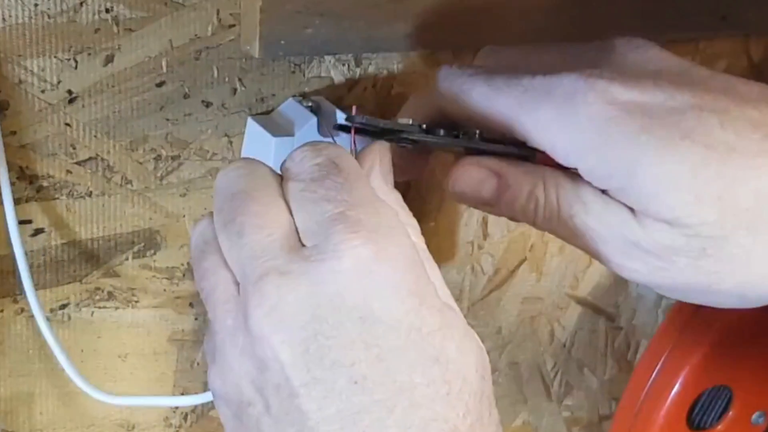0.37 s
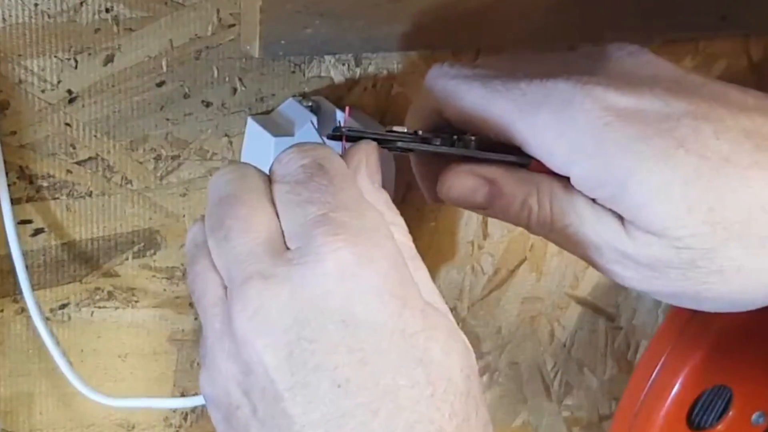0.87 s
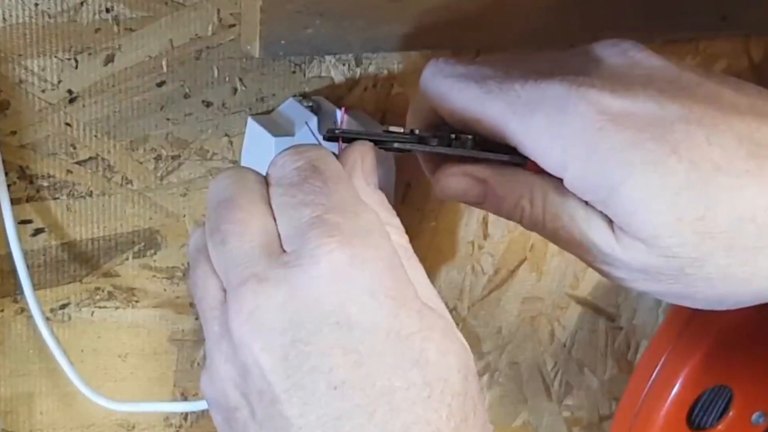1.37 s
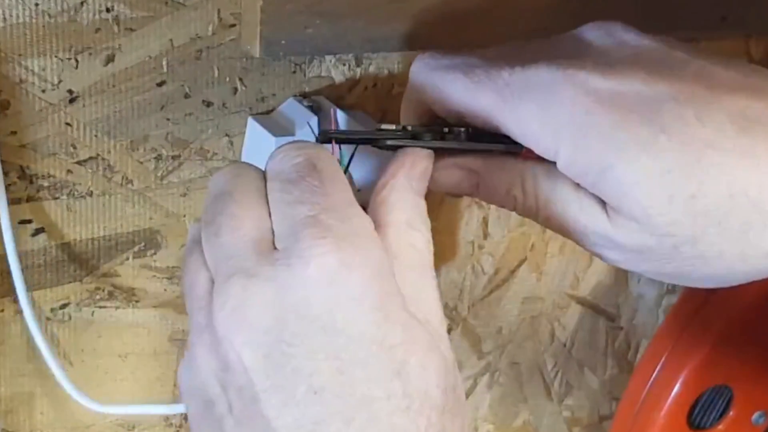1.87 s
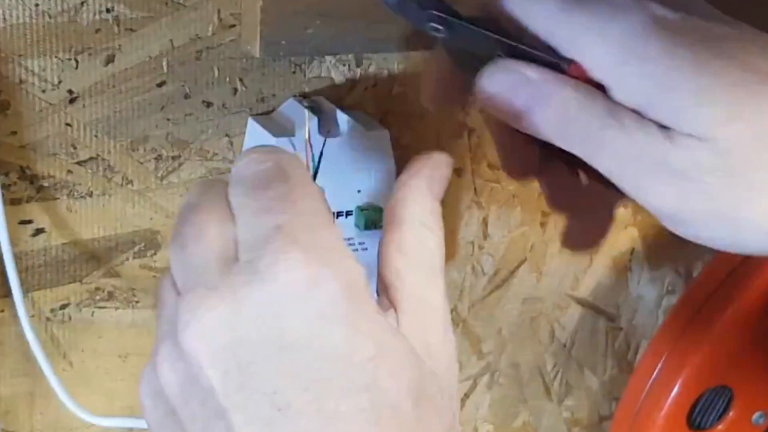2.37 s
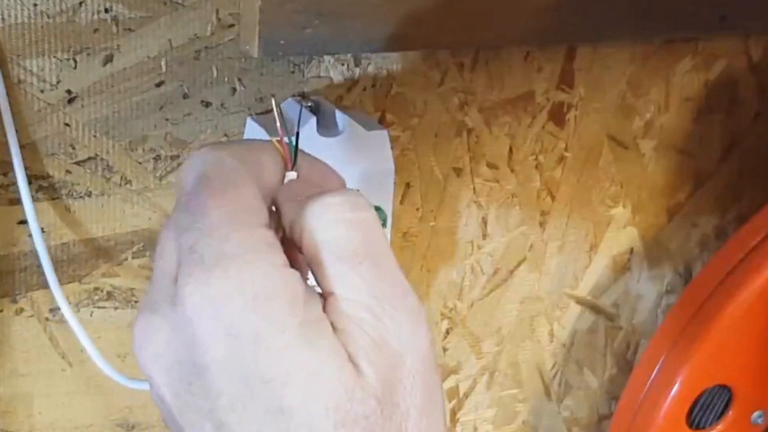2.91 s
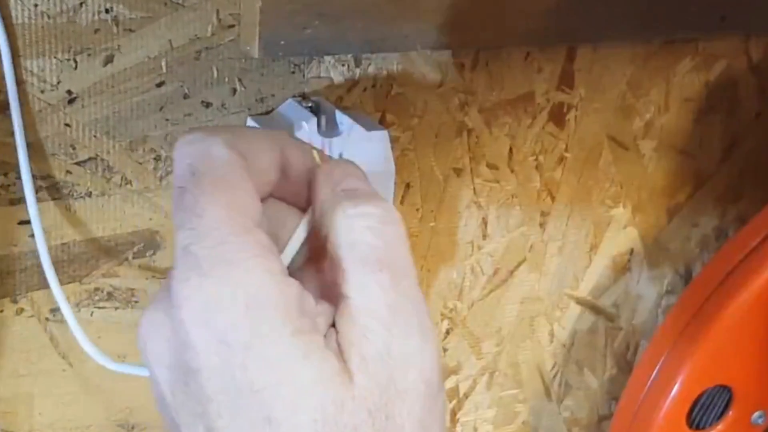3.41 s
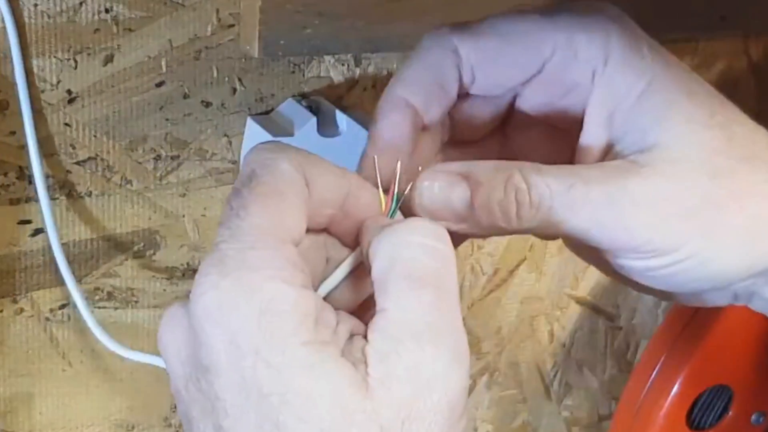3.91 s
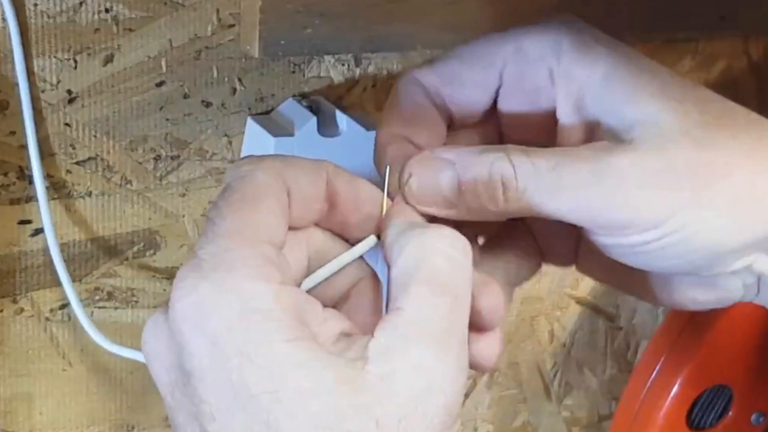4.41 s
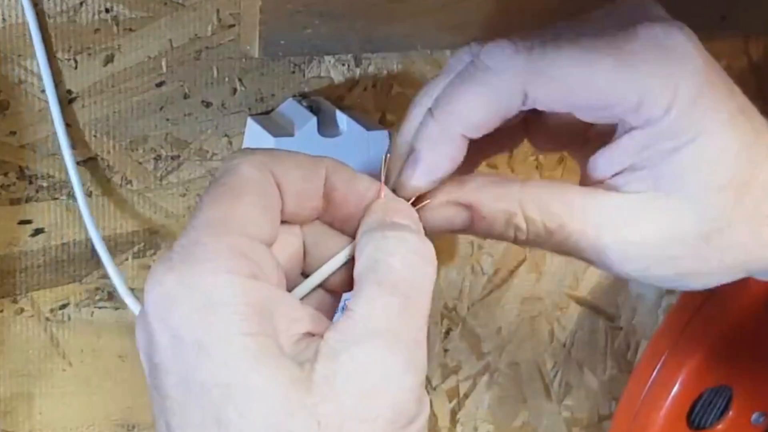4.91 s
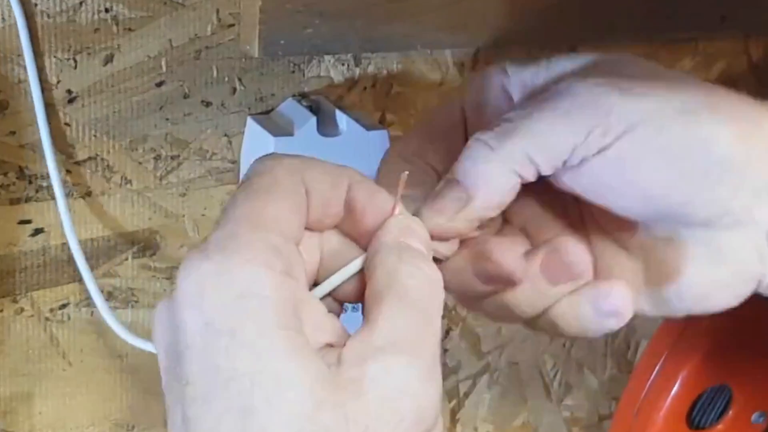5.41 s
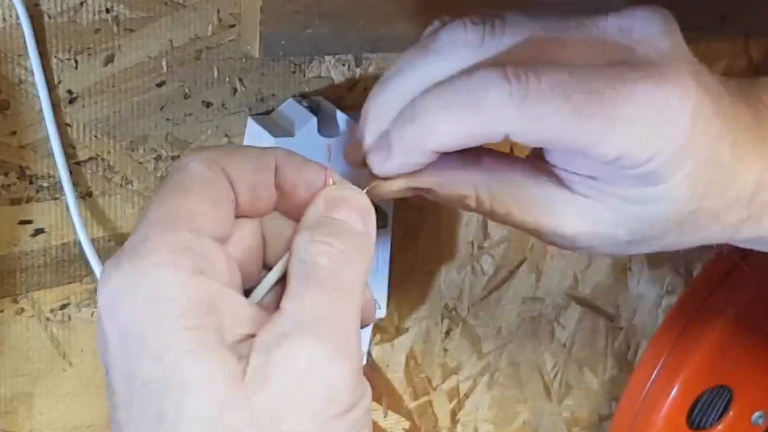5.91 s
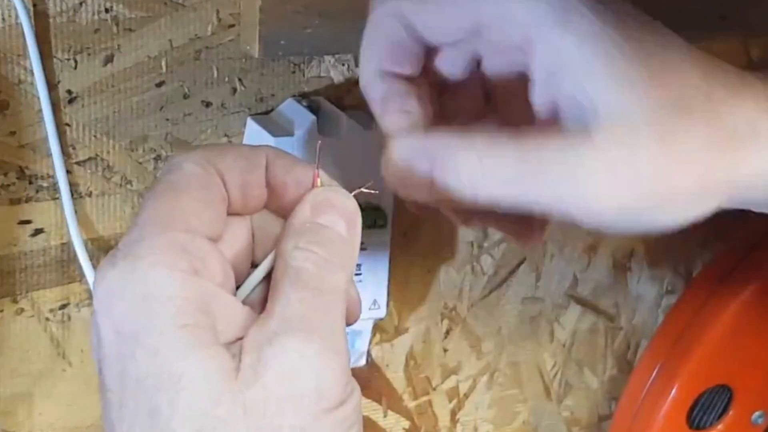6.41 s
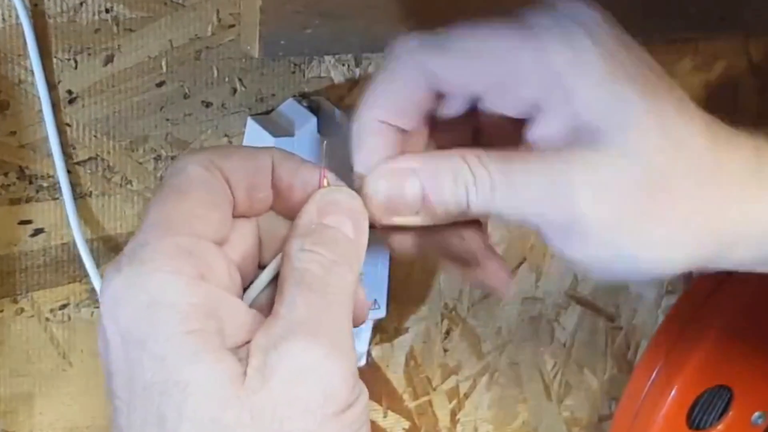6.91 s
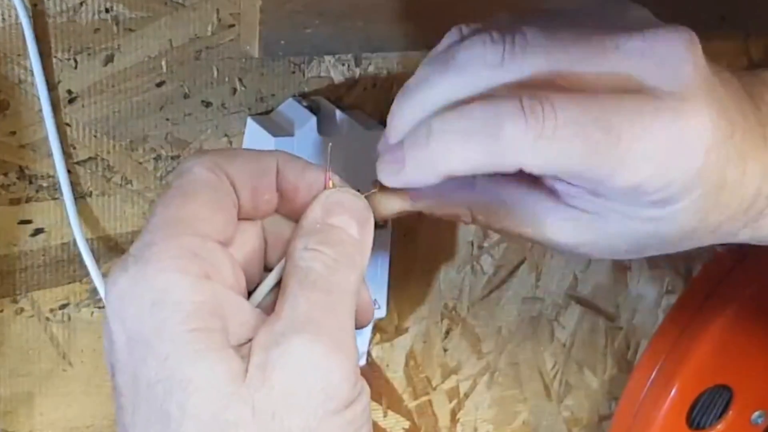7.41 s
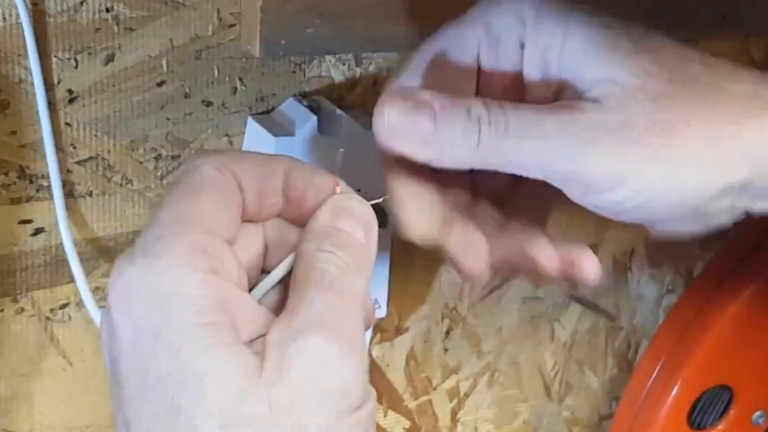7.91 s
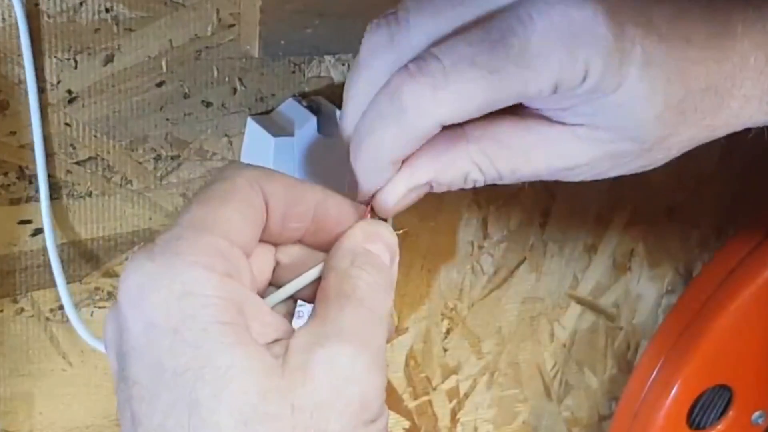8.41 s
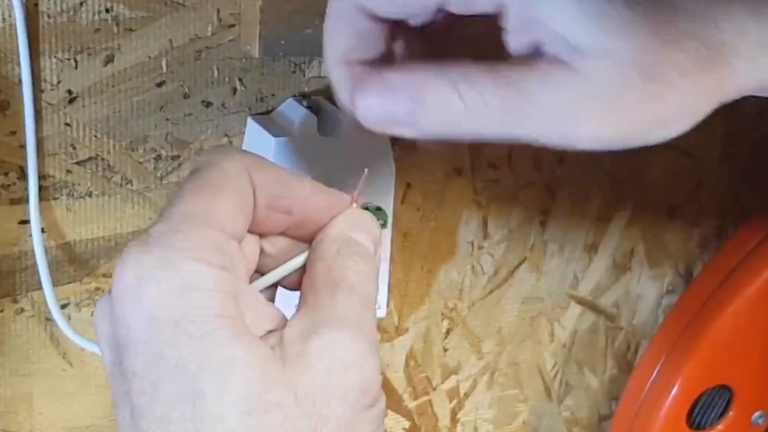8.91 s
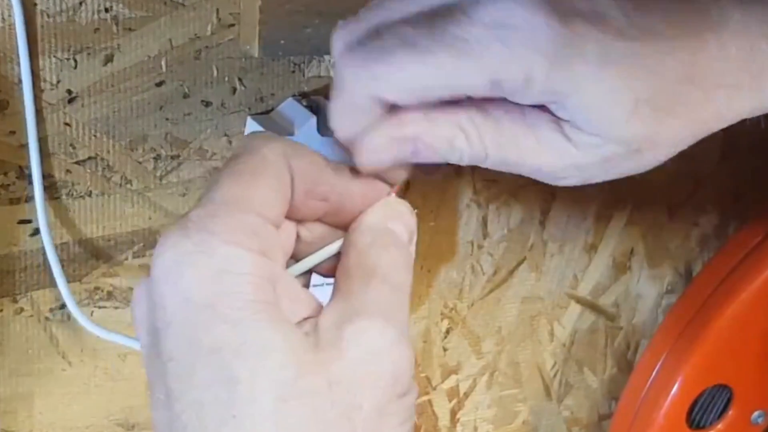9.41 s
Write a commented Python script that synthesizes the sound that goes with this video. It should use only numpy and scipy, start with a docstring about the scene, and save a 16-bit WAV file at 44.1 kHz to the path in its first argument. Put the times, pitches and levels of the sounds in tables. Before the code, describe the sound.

A small room with a soft, wavering low hum, faint mains buzz and a light fan-like hiss throughout, heard close in stereo. The first second is almost only hum; a dull bump and tiny ticks come around 1.3-1.5 s. At 2.2 s there is a bump with a crack, then light cable knocks from 2.35 to 2.85 s and faint high metallic chinks near 2.6 s. At 3.2 s a hand tool drops onto the wooden board: by far the loudest event, a hard hollow clack and rapid bounces, weakening until about 3.8 s, with low brushing of hands. Then it is quiet, with sparse strand ticks and faint bumps until 5 s. Soft cable taps and brushing come at 5.6 s, more taps at 6.2-7.3 s, crisp finger rubs near 7.1 and 7.9 s, several knocks at 8.0-8.3 s, a firmer tap at 8.9 s, a sharp tick at 9.15 s, and small rustles to the end at about 9.5 s.

```python
"""Stripping thin wires at a bench

Hands strip and twist thin wires over a chipboard bench in a small room with a humming machine.
The loose cable knocks on the board, hands and stripper bump it, the stripper drops and bounces: each
blow sets off a bank of decaying modes. Strands tick and fingers rub as short puffs of grainy noise,
sleeves brush as lumpy low noise. A wavering tone, mains buzz harmonics and a fan-like hiss lie under it.
"""
import sys
import numpy as np
from scipy import signal
from scipy.fft import rfft, irfft, next_fast_len
from scipy.io import wavfile
from scipy.ndimage import uniform_filter1d, map_coordinates

SR = 44100
rng = np.random.default_rng(int(sys.argv[2]) if len(sys.argv) > 2 else 0)


def boost(x):
    """Linear amplitude factor 10**(x/20) for a level x in decibels (scalar or array-like)."""
    u = np.asarray(x, float) / 20
    return 10 ** u


def dump_mix(stems):
    """Bounce the given channels to the path in sys.argv[1] as a 16-bit WAV at rate SR."""
    frames = np.atleast_2d(stems).T  # one column per channel
    limited = np.clip(frames, -1, 1)  # hard clip at full scale
    pcm = np.round(limited * 32767).astype(np.int16)
    wavfile.write(sys.argv[1], SR, pcm)


N = 421155  # length in samples


def unit(x):
    """Scale to rms 1."""
    return x / np.sqrt(np.mean(x ** 2) + 1e-20)


def along(points, hz):
    """Read a curve of (frequency [Hz], value) points on a log frequency axis."""
    f, v = np.transpose(points)
    return np.interp(np.log(hz + 1), np.log(f + 1), v)


def wobble(rate):
    """A smooth random curve, rate knots a second."""
    knots = rng.standard_normal(int(N * rate / SR) + 4)
    return map_coordinates(knots, [np.arange(N) * rate / SR])


def coloured(spectrum, alike, size):
    """Stereo noise of rms 1 with a spectrum and a left-right likeness."""
    m = next_fast_len(size)
    hz = np.fft.rfftfreq(m, 1 / SR)
    turn = np.arccos(np.clip(along(alike, hz), -1, 1)) / 2
    z = rfft(rng.standard_normal((2, m))) * boost(along(spectrum, hz))
    mid, side = irfft(z * [np.cos(turn), np.sin(turn)], m)[:, :size]
    return unit(np.array([mid + side, mid - side]))


def add(track, s, sound):
    """Mix a stereo sound in at time s."""
    i = round(s * SR)
    track[:, i:i + sound.shape[1]] += sound


def sides(pan_db):
    """Left and right gains for a level of left over right."""
    return boost(np.multiply.outer([.5, -.5], pan_db))


def ringing(modes, travel, lag, attack, rough, apart_hz=1500):
    """Each mode at both ears; bending waves carry the treble faster, so delay goes as 1 / sqrt(Hz).
    A mode stands for a crowd of close neighbours, so its phase drifts, the more so the higher it lies."""
    hz, db, t60 = np.transpose(modes)[:3, :, None]
    # a positive lag delays the left side, a negative one the right
    delay = travel * np.sqrt(1000 / hz) + np.abs(lag) * np.reshape([lag > 0, lag < 0], (2, 1, 1))
    t = np.maximum(np.arange(SR // 4) / SR - delay, 0)

    shared, own = np.cumsum(rng.standard_normal((2, len(hz), SR // 100)), axis=2)
    # bass drifts alike at both ears
    walk = shared + np.multiply.outer([1, -1], own * np.minimum(hz / apart_hz, 1))
    # one random step every 32 samples, smoothed
    walk = np.repeat(walk - walk[..., :1], 32, axis=2)[..., :SR // 4]
    walk = uniform_filter1d(uniform_filter1d(walk, 32, axis=2), 32, axis=2)
    drift = walk * np.sqrt(2 * np.pi * rough * hz * np.sqrt(hz / 1000) * 32 / SR)

    envelope = boost(db - 60 * t / t60) * (1 - np.exp(-t / attack)) ** 2
    return envelope * np.sin(2 * np.pi * hz * t + drift)


def strike(rows, modes, pivot_hz, scatter_db, tilt_db, attack, pan_db=0, reach_hz=SR, **body):
    """Every blow excites the same modes, tilted by its brightness [dB per octave] and scattered a little;
    a soft contact reaches only low modes."""
    out, hz = np.zeros((2, N + SR)), np.transpose(modes)[0]
    radiation = sides(np.transpose(modes)[3] if len(modes[0]) > 3 else 0 * hz)
    scatter = scatter_db * rng.standard_normal((len(rows), len(hz)))
    blows = np.broadcast(*np.transpose(rows)[:2], tilt_db, reach_hz, attack)
    for (s, db, tilt, reach, rise), chance in zip(blows, scatter):
        level_db = db + tilt * np.log2(hz / pivot_hz) + chance
        gains = radiation * boost(level_db) / (1 + (hz / reach) ** 4)
        modes_ringing = ringing(modes, attack=rise, **body)
        add(out, s, np.einsum("cm,cmt->ct", gains, modes_ringing) * sides([pan_db]))
    return out[:, :N]


def hiss():
    """The hiss of the room: coloured stereo noise whose level wavers slightly."""
    # spectrum: (frequency [Hz], relative density [dB per Hz])
    spectrum = [(20, -7), (40, -14.5), (64, 1), (90, -7.5), (150, -16), (250, -16), (500, -21), (1000, -23),
                (1400, -24.5), (2200, -19.5), (3500, -26), (5000, -36), (8500, -42), (14000, -34),
                (16000, -34.5)]
    # (frequency [Hz], left-right likeness [-1 to 1])
    alike = [(60, 0.64), (180, 0.34), (550, -0.17), (1650, -0.045), (4970, 0.068), (15000, -0.5)]
    return boost(-59.5 + 0.14 * wobble(1.5)) * coloured(spectrum, alike, size=N)


def buzz():
    """Mains buzz: steady-pitched harmonics, each slightly unsteady in level and shifted between the ears."""
    base_hz = 119.6  # twice the mains
    # harmonics: (multiple of base_hz, mean level [dB rms])
    harmonics = [(1, -70.5), (3, -72), (4, -71.5), (5, -86), (7, -76.5), (8, -83.5), (9, -87.5), (11, -85),
                 (18, -85), (22, -84), (25, -105), (29, -96), (31, -85.5)]
    t = np.arange(N) / SR
    turns = rng.uniform(0, 2 * np.pi, (len(harmonics), 2, 1))
    out = np.zeros((2, N))
    for (k, db), (left, right) in zip(harmonics, turns):
        phase = left + 0.19 * right * [[0], [1]]
        level = np.sqrt(2) * boost(db + 0.45 * wobble(3.9))
        out += level * np.sin(2 * np.pi * k * base_hz * t + phase)
    return out


def hum():
    """The machine's hum: one low tone, wavering in phase and level."""
    hum_hz = 63.9
    # hum level before its random wavering: (time [s], level [dB rms])
    levels = [(0.0, -52), (0.2, -50), (0.79, -48.5), (1.09, -50), (2.02, -47.5), (2.74, -50), (3.4, -48),
              (3.9, -47), (4.12, -49.5), (4.45, -48), (4.8, -52.5), (5.08, -48.5), (6.41, -49.5),
              (6.89, -49), (7.9, -50), (8.16, -48.5), (9.55, -49.5)]
    s, db = np.transpose(levels)
    t = np.arange(N) / SR
    phase = 2 * np.pi * hum_hz * t + .4 * wobble(2.5) + 0.14 * wobble(13)
    level = np.sqrt(2) * boost(np.interp(t, s, db) + 0.67 * wobble(4.7))
    return level * np.sin(phase) * sides([.6])


def brushing():
    """Palms and sleeves brush the board: lumpy low friction noise while the hands shift."""
    # brushing level before its random lumps: (time [s], level [dB])
    levels = [(0, -86), (3.3, -71), (3.4, -58.5), (3.6, -57.5), (4.0, -72), (4.8, -72), (5.1, -67),
              (5.4, -74), (5.62, -62), (6.0, -66.5), (6.15, -79.5), (7.5, -81), (7.9, -60.5),
              (8.001, -71.5), (9.55, -75.5)]
    # colour of the friction: (frequency [Hz], relative density [dB per Hz])
    skin = [(80, -23), (200, -1), (400, 0), (700, -3.5), (1000, -12), (3000, -27), (6000, -59)]
    s, db = np.transpose(levels)
    level = boost(np.interp(np.arange(N) / SR, s, db) + 2.56 * wobble(24))
    return level * coloured(skin, [(300, 0.59)], size=N)


def strands():
    """Short puffs of grainy friction noise: ticks start almost at once, rubs swell."""
    # sudden ticks of strands and cracks of the tool:
    # (time [s], treble [dB], t60 [s], body over treble [dB], left over right [dB])
    ticks = [(1.319, -81, .055, 26.5, 5), (1.543, -70, 0.025, -20, -1.1), (2.194, -58, 0.094, 9.5, 5.5),
             (2.335, -62, .089, -0.5, 10), (2.581, -59, .07, 0.5, 4), (2.628, -61.5, .23, -5, 3.2),
             (3.177, -65.5, .06, 14, 2.3), (3.225, -35.5, 0.067, 5.5, 1.5), (3.266, -40, 0.1, 13.5, 2),
             (3.30, -69.5, 0.3, 21, 0.2), (3.342, -68.5, 0.13, 24, -6), (3.357, -72, .13, 27, 1.5),
             (3.823, -70.5, .064, 15.5, 1), (4.246, -64.5, 0.033, 18.5, 11), (4.422, -72, 0.073, 18.5, 10),
             (4.544, -73.5, 0.057, 18, 8), (4.82, -82, 0.095, 17, 13), (8.651, -54, 0.031, 11, 6.5),
             (9.08, -74, 0.063, 16.5, 4), (9.147, -52.5, 0.016, -26, -6), (9.513, -62.5, 0.044, 8, 6.5)]
    # fingers rub along the strands: (time [s], treble [dB], t60 [s], body over treble [dB])
    rubs = [(5.0, -68.5, 0.2, 6.5), (5.52, -67, .13, -4), (6.35, -63.5, 0.084, 9.5),
            (7.056, -53.5, 0.056, 0), (7.08, -62, .3, -4), (7.69, -71, 0.29, 6), (7.875, -47, 0.052, -4),
            (7.90, -60.5, .15, 5), (8.73, -73.5, 0.21, 15), (8.83, -64, 0.22, -2), (9.383, -65, 0.14, -1)]
    # treble and body colours: (frequency [Hz], relative density [dB per Hz])
    fizz_colour = [(2000, -55), (4500, -11), (8000, -5.5), (10000, -7.5), (13000, -1), (16000, -5)]
    body_colour = [(200, -18), (700, 4), (1500, -0.5), (2500, -3.5), (5000, -12), (8000, -25)]
    tick_rise, rub_rise = 0.004, .12  # rise time as a share of t60
    rub_pan_db = 3.5  # left over right

    lead_s = .15  # room for the swell ahead of the peak
    out, t = np.zeros((2, N + SR)), np.arange(SR // 2) / SR - lead_s
    puffs = [(*row, tick_rise) for row in ticks] + [(*row, rub_pan_db, rub_rise) for row in rubs]
    for s, db, t60, body_db, pan_db, rise in puffs:
        shape = np.where(t < 0, np.exp(np.minimum(t, 0) / (rise * t60)), boost(-60 * t / t60))
        fizz = coloured(fizz_colour, [(1000, .1)], size=len(t))
        # strands slip in grains of 30 samples
        grains = np.repeat(rng.standard_normal(len(t)), 30)[:len(t)]
        fizz = unit(fizz * boost(4 * grains))
        body = coloured(body_colour, [(1000, .3)], size=len(t))
        add(out, s - lead_s, boost(db) * shape * (fizz + boost(body_db) * body) * sides([pan_db]))
    return out[:, :N]


def bumps():
    """Hand and stripper bump the bench close by: dull blows on its modes, left side first."""
    # (time [s], strength [dB], brightness [dB per octave], contact reach [Hz])
    hits = [(1.3193, -38, 1, 4000), (2.207, -36, 3.5, 1110), (2.249, -46.5, -0.5, 890),
            (3.028, -55, -1, 500), (3.152, -40, 4.5, 2000), (3.226, -24.5, -9.5, 900),
            (3.237, -35, 0.1, 500), (3.268, -20.5, -3.5, 900), (3.278, -24.5, 7, 600),
            (3.299, -30, 4, 400.6), (3.312, -35, -12, 500), (3.342, -41, 7.5, 900), (3.364, -46.5, 15, 910),
            (3.425, -43, -10.5, 300), (3.709, -56, -16, 249), (3.888, -51, -2.5, 380), (3.964, -57, 9, 803),
            (4.698, -61.5, 11, 910), (5.178, -58, 10.5, 550), (5.291, -53, 5, 401), (5.453, -49, 8.5, 592)]
    # bench modes near the hands: (frequency [Hz], relative level [dB], t60 [s])
    bench = [(121.7, -16, 0.45), (149.7, -6.5, 0.1), (191.3, -4.5, 0.017), (234, -0.5, 0.087),
             (318.7, 6, 0.041), (370, 1, 0.025), (436, -7.5, 0.097), (556, -1, 0.07), (820, -4.5, 0.026),
             (982, -7.5, 0.055), (1220, -10.5, 0.099), (1697, -9.5, 0.059), (2033, -6, 0.043),
             (2470, -12, 0.07), (2800, -28, 0.032), (3350, -14, 0.0302), (4485, -20, .03)]
    tilt_db, reach_hz = np.transpose(hits)[2:]
    return strike(hits, bench, pivot_hz=300, scatter_db=3, tilt_db=tilt_db, pan_db=2.1, reach_hz=reach_hz,
                  travel=0.00036, lag=-0.0002, attack=0.00059, rough=0.11)


def cable():
    """The cable taps the far part of the board: its modes ring, treble and right side first,
    with one broad push per knock; softer knocks are duller."""
    # cable knocks: (time [s], strength [dB])
    knocks = [(2.347, -39), (2.529, -43), (2.604, -44.5), (2.762, -47.5), (2.835, -55), (3.576, -44.5),
              (5.565, -43), (5.620, -45), (6.235, -51), (6.382, -48.5), (6.487, -48.5), (6.958, -47),
              (7.053, -53), (7.219, -45.5), (7.252, -52.5), (8.035, -44), (8.144, -43.5), (8.212, -46),
              (8.276, -49), (8.713, -54.5), (8.920, -40), (9.119, -54.5), (9.344, -53)]
    # board modes: (frequency [Hz], relative level [dB], t60 [s], left over right [dB])
    board = [(132.6, -5.5, 0.1, 2.5), (158, -3.5, 0.18, -3), (228, -8, 0.22, -8.5), (340.3, -2, 0.18, 4.5),
             (460.3, 2, 0.25, -2.5), (552, 3.5, 0.05, 4.5), (634, -3.5, 0.11, 14), (775, 1, 0.12, 2),
             (870, -7, 0.078, 11.5), (963, -1, .1, -2), (1230, -25, 0.078, -25.5), (1420, -6, 0.13, -0.5),
             (1521, -11.5, 0.063, 19), (1633, -12.5, 0.044, -22.5), (1905, -17, 0.12, 12),
             (2085, -11.5, 0.16, 12), (2238, -28.5, 0.093, -19), (2462, 2.5, 0.075, 0),
             (2850, -14, 0.03, -9), (3110, -11, 0.038, 21), (3384, -14, 0.037, 5), (4110, -6.5, 0.06, -0.5),
             (4350, -12, 0.013, 3), (5200, -42, 0.038, 4), (5870, -15, 0.038, 5.5), (5750, -35, .03, 2)]
    dulls_db = 0.0559  # dB per octave of brightness lost for each dB under the firmest knock
    # the board's push: delay after the knock time, pitch, level over the knock
    push_s, push_hz, push_db = 0.00607, 623.4, 8.5

    out = np.zeros((2, N + SR))
    u = (np.pi * push_hz * (np.arange(SR // 50) / SR - push_s)) ** 2
    push = (1 - 2 * u) * np.exp(-u)  # one crest between two dips
    for s, strength_db in knocks:
        add(out, s, boost(strength_db + push_db) * push * sides([-1.5]))

    db = np.transpose(knocks)[1]
    tilt_db = dulls_db * (db - db.max()) + 0.09
    return out[:, :N] + strike(knocks, board, pivot_hz=500, scatter_db=2.5, tilt_db=tilt_db,
                               travel=0.001368, lag=.0003, attack=0.00105, rough=0.031)


def stripper():
    """The dropped stripper's hollow handle rings briefly at each bounce; its loose jaws chink."""
    # it lands, clatters and rocks to rest: (time [s], strength [dB])
    bounces = [(3.224, -13.5), (3.2652, -3), (3.280, -15), (3.295, -35.5), (3.322, -26.5), (3.340, -15),
               (3.354, -23), (3.380, -21), (3.407, -33.5), (3.514, -21), (3.649, -26), (3.742, -29),
               (3.803, -36), (3.842, -44)]
    # handle modes: (frequency [Hz], relative level [dB], t60 [s])
    handle_modes = [(1136, -34, 0.062), (1634, 5, 0.031), (1807, -3.5, 0.026), (2007, -14.5, 0.035),
                    (2761, -19, 0.054), (2920, -15.5, 0.034), (3760, -20, 0.019), (4620, -26.5, 0.052),
                    (5826, -39, 0.021), (6570, -27, 0.033)]
    # harder landings are shorter and reach higher modes: (strength [dB], reach [Hz], attack [s])
    contact = [(-18, 2400, 0.0042), (-16, 12000, 0.0027)]
    # the jaws chink as they open: (time [s], strength [dB])
    chinks = [(2.5844, -62), (2.6279, -75), (2.6644, -68)]
    # jaw modes: (frequency [Hz], relative level [dB], t60 [s])
    jaw_modes = [(6960, -4, 0.065), (9470, 3.5, 0.059), (11800, -2, .06), (13600, -5, .08)]

    db, reach_hz, attack = np.transpose(contact)
    strength_db = np.transpose(bounces)[1]
    handle = strike(bounces, handle_modes, pivot_hz=1610, scatter_db=1.5, tilt_db=0.4, pan_db=6.5,
                    reach_hz=np.interp(strength_db, db, reach_hz), travel=.0001, lag=-.0001,
                    attack=np.interp(strength_db, db, attack), rough=0.0028)
    jaws = strike(chinks, jaw_modes, pivot_hz=9400, scatter_db=2, tilt_db=4.0, pan_db=5,
                  travel=.0001, lag=-0.000104, attack=.0005, rough=.0007)
    return handle + jaws


def room(x):
    """The room's answer: a noise tail in which each frequency dies at its own speed."""
    # (frequency [Hz], t60 [s])
    decay = [(100, 0.44), (500, 0.42), (2000, 0.42), (10000, 0.1)]
    # (frequency [Hz], left-right likeness [-1 to 1])
    echo_alike = [(100, 0.94), (400, 0.66), (1500, 0.01)]
    noise = coloured([(100, 0)], echo_alike, size=SR // 2)
    hz, t, z = signal.stft(noise, SR, nperseg=256)
    fading = z * boost(-60 * t / along(decay, hz)[:, None])
    tail = signal.istft(fading, SR, nperseg=256)[1]
    tail = tail / np.linalg.norm(tail[0])
    late = np.pad(x, ((0, 0), (200, 0)))  # starts 200 samples after the direct sound
    return signal.fftconvolve(late, tail, axes=1)[:, :N]


def scene():
    """Hits with their room, over the hum; the stripper falls nearer, so it is drier."""
    near = stripper()
    far = cable() + bumps() + strands()
    # the blows carry no deep bass
    far = signal.sosfilt(signal.butter(3, 98, "high", fs=SR, output="sos"), far)
    echo = room(boost(-22.5) * near + boost(-16.0) * far)
    return near + far + echo + brushing() + hum() + buzz() + hiss()


def low_pass(x):
    """Removes everything above the highest recorded frequency."""
    return signal.sosfilt(signal.butter(12, 16480, fs=SR, output="sos"), x)


def record(dry):
    """The top edge of the finished sound: a steep low-pass at 16.2 kHz."""
    mix = signal.sosfilt(signal.butter(10, 16200, fs=SR, output="sos"), dry)
    return low_pass(mix)


dry = scene()
out = record(dry)
dump_mix(out)
```